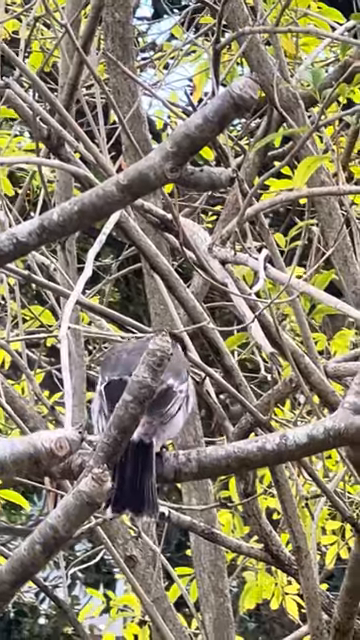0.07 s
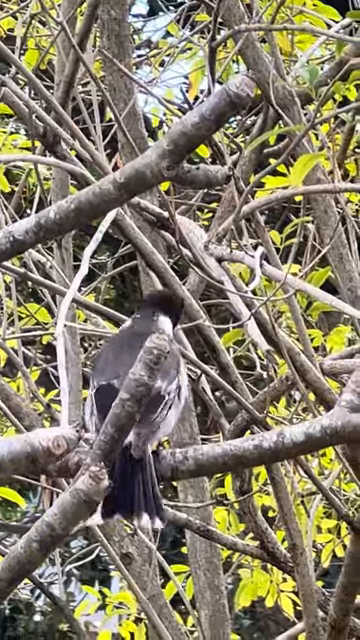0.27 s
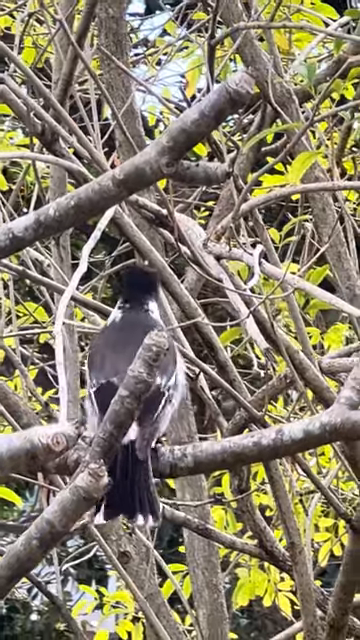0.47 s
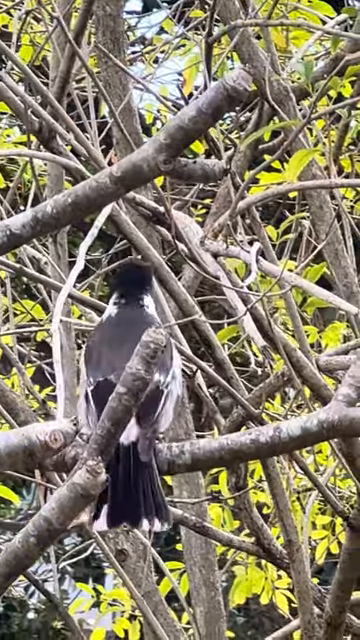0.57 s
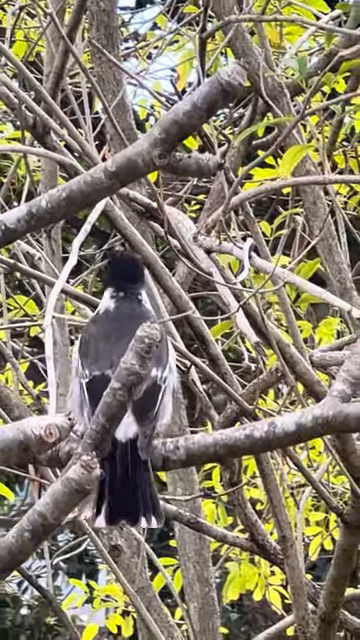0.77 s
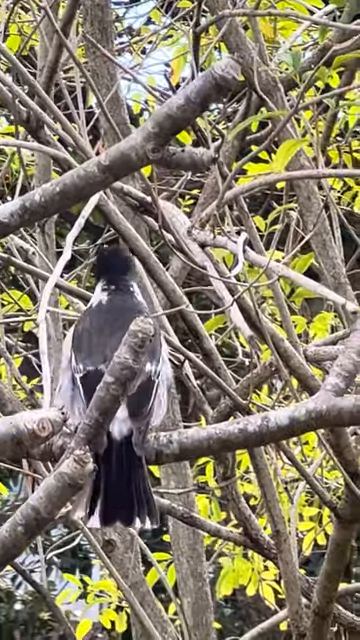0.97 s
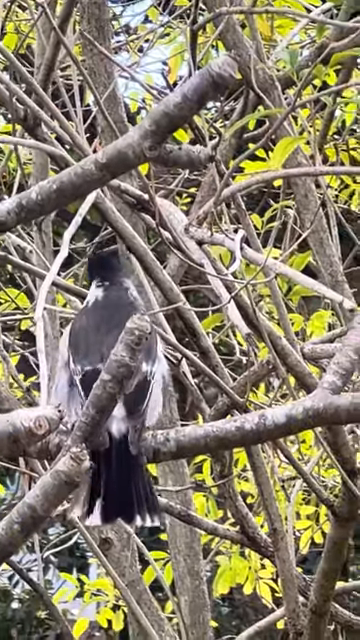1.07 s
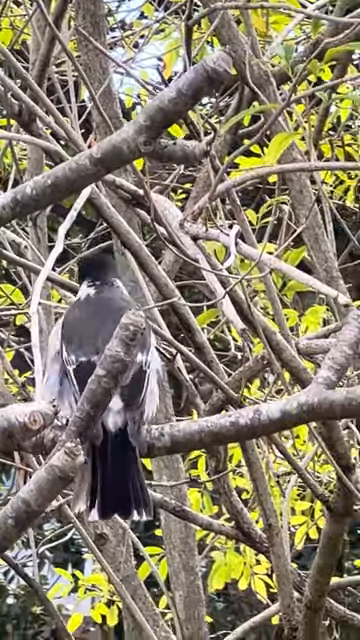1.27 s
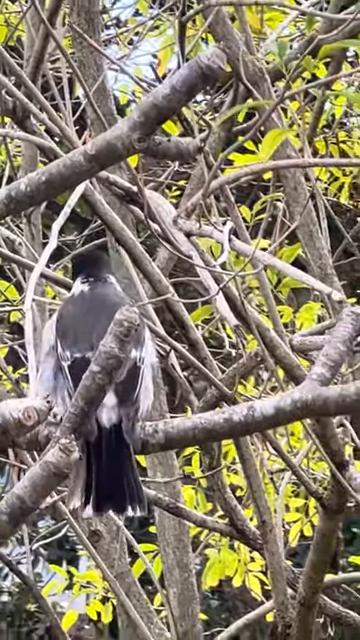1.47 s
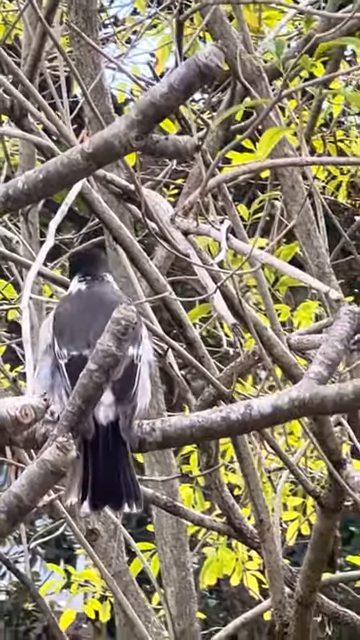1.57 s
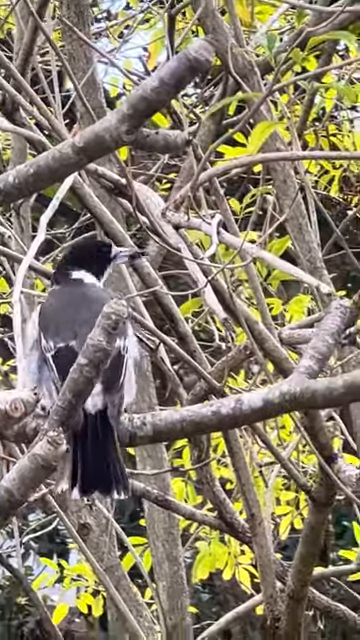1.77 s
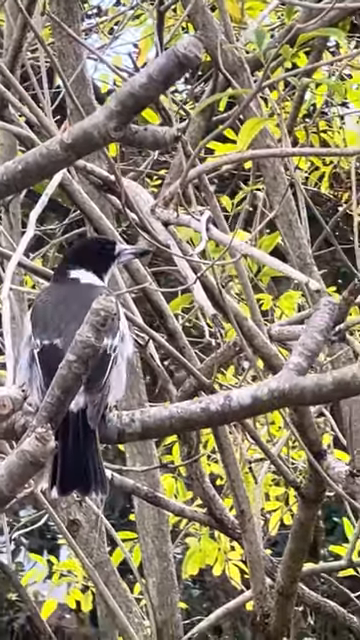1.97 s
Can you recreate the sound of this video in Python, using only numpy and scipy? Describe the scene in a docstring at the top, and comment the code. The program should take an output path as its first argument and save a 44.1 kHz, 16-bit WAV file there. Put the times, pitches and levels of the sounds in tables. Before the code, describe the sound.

A butcherbird sings close by: a rasp, clear slurred whistles, another rasp, then soft falling warbles

```python
"""Butcherbird close by among trees

A butcherbird sings from a near branch: a rasp, five down-slurred whistles, a lower rasp that snaps
into a last whistle, then soft, mostly falling warbles, a thin high tone and small clicks.
Whistles are gliding sines with flickering overtones; rasps are tones chopped by a flutter, plus hiss.
The trees answer with delayed copies and a tail of dying noise; a faint call wavers far off,
and light air, made of shaped noise and low bumps, rumbles on the microphone."""
import sys
import numpy as np
from scipy import signal
from scipy.fft import rfft, irfft
from scipy.io import wavfile

SR = 44100
rng = np.random.default_rng(int(sys.argv[2]) if len(sys.argv) > 2 else 0)


def put_to_file(sound):
    """Save the sound as 16-bit audio at rate SR, in the file named by the first command-line argument."""
    columns = np.atleast_2d(sound).T  # one column per channel
    safe = np.clip(columns, -1, 1)
    whole_steps = np.round(safe * 32767)
    wavfile.write(sys.argv[1], SR, whole_steps.astype(np.int16))


N = 88200
T = np.arange(N) / SR

# Whistled notes: start_s, length_s, held_pitch_hz, start_above_hz, slur_time_s, sag_hz_per_s, level_db,
# overtones_db, left_lean_db, final_drop_hz, bill_resonance_hz
WHISTLE_NOTES = [(0.262, 0.076, 1431, 299, 0.0076, 0, -23.5, -3, 19, 1.5, 7330),
                 (0.426, .037, 1476, 331, 0.0065, 49, -22, -6, 20, -22.5, 6700),
                 (0.532, .058, 2017, 301, .022, -2.5, -34.5, 10.5, 25, 217.5, 4300),
                 (0.633, 0.097, 1518, 747.5, 0.0055, -21, -21.5, -2, 9.5, -24, 5080),
                 (0.801, 0.046, 1493, 148.5, 0.0078, 652.5, -24.5, -1, 22, 2.5, 5460),
                 (1.071, 0.029, 1494, -400, 0.00502, 1495, -24, -1.5, 32, 114, 4450)]
# Overtone colour of whistles and chirps: frequency_hz, level_db
WHISTLE_OVERTONES = [(2900, -33), (4400, -26.5), (7400, -27.5), (8600, -41), (12200, -40.5), (13500, -47.5),
                     (15200, -39.5)]
ATTACK_S, RELEASE_S, DROP_S = 0.011, 0.0061, 0.0034
OVERTONE_LEAD_S = .005  # overtones let go this much before the whistle
JITTER_SHARE, JITTER_HZ, WAVER_SHARE = 0.0024, 483, 0.00262  # shares of the pitch
BILL_DB, BILL_WIDTH_HZ, FLICKER_DB = 6.5, 510, 3.5

# Quick falling chirps that lead into a whistle: start_s, length_s, pitch_hz, level_db, overtones_db
CHIRPS = [(0.408, 0.013, 1900, -44.5, 8.5), (0.623, 0.011, 2380, -37.5, 20.5),
          (.798, 0.0069, 1650, -30, 2.5)]
# Colour of the air after each chirp: frequency_hz, density_db_per_hz
PUFF_COLOUR = [(1500, -22.5), (6500, 2), (15500, -19.5)]
CHIRP_FALL_HZ_PER_S = 28000
PUFF_DB, PUFF_DECAY_S = -20, 0.019

# Rasped notes: start_s, length_s, pitch_hz, rise_hz_per_s, pulses_per_s, attack_s, level_db,
# swell_db_per_s, low_tone_hz, low_tone_db, hiss_db, hiss_swell_db_per_s
RASP_NOTES = [(0.143, .106, 1659, 1895, 160, 0.043, -35, 86.5, 834, -20, -15, 117.5),
              (0.935, 0.133, 1277, 1200, 140, 0.016, -33.5, 19, 712, -17.5, -16.5, 12)]
# Hiss colour, one curve per rasp: frequency_hz, density_db_per_hz
RASP_HISS_COLOURS = [
    [(750, -7.5), (2200, 12.5), (3900, -13), (5750, 6), (7000, -9), (15200, -36)],
    [(600, -13), (2000, 10), (3300, -22.5), (4700, 10), (5700, -8), (7100, -1.5), (8100, -59), (9300, -7),
     (10900, -33), (15200, -19)],
]
# Lower tones inside a rasp: pitch_ratio, level_db
RASP_LOW_TONES = [(1, -0.5), (1.27, -5)]
RASP_DEPTH = .65
RASP_PULSE_JITTER, RASP_PITCH_JITTER, RASP_BEND, LOW_JITTER = .16, .032, .045, .035  # shares

# Soft warbles, one curve per note: time_s, pitch_hz, level_db
WARBLE_CURVES = [
    [(1.61, 2178, -62), (1.623, 1398, -50), (1.642, 1188, -44), (1.668, 1006, -59.5)],
    [(1.664, 780, -47.5), (1.677, 795, -42), (1.700, 870, -55.5), (1.716, 747, -43), (1.728, 626, -54.5)],
    [(1.750, 692.5, -56.5), (1.772, 713, -44.5), (1.786, 782, -56)],
    [(1.785, 5520, -78.5), (1.83, 6900, -80)],
    [(1.954, 2234, -60), (1.966, 2280, -53.5), (1.975, 1562, -48.5), (1.992, 1227, -41.5), (2.0, 1264, -38)],
]
# Overtone colour of the warbles: frequency_hz, level_db
WARBLE_COLOUR = [(3500, -40.5), (4500, -9.5), (4900, -20.5)]
# Thin high tone above the warbles: time_s, pitch_hz, level_db
THIN_TONE_CURVE = [(1.615, 2430, -73), (1.72, 2723, -72), (1.885, 2754, -68)]
# Small clicks of bill and perch: start_s, ring_hz, decay_s, ring_db, broad_tick_db
BILL_CLICKS = [(1.278, 540, 0.0024, -39, -84), (1.348, 3220, 0.0051, -56, -47),
               (1.92, 1590, 0.003, -35.5, -46.5), (1.922, 521, 0.0028, -42, -71)]

# Echoes off trunks and ground: delay_s, left_db, right_db
TREE_ECHOES = [(0.0125, -38, -6.5), (0.0241, -10.5, -26.5), (0.0311, -23.5, -8), (.072, -28.5, -12.5)]
# Colour of the near foliage: frequency_hz, level_db
NEAR_COLOUR = [(1500, -7), (4500, 2.5), (9000, 12)]
# Colour of the far trees: frequency_hz, level_db
FAR_TREE_COLOUR = [(700, 4), (7000, 7), (10000, -29)]
ECHO_DULL_HZ = 3490
NEAR_DB, NEAR_T60_S, FAR_DB, FAR_T60_S = -2, 0.16, -16.5, 0.65  # T60: time to die by 60 dB

# Distant wavering call: time_s, pitch_hz, level_db
FAR_CALL_CURVE = [(1.29, 669, -68), (1.4, 758.6, -62), (1.67, 728, -71)]
FAR_WAVER = 0.049  # share of the pitch

# Rumble on the microphone: frequency_hz, density_db_per_hz
RUMBLE_COLOUR = [(25, -22), (65, 0.5), (170, -10), (260, -24.5), (1500, -65)]
# Soft bumps on the microphone: start_s, pitch_hz, decay_s, level_db
MIC_BUMPS = [(0.354, 226, 0.012, -43), (0.393, 107.6, 0.011, -32.5), (1.332, 77, 0.017, -31.5),
             (1.476, 127.6, 0.0085, -33)]
# Hush shared by both channels: frequency_hz, density_db_per_hz
AIR_COLOUR = [(1450, -8), (2400, -15.5), (13000, -49.5)]
# Faint wide murmur around 700 to 1200 Hz, separate in each channel: frequency_hz, density_db_per_hz
DISTANT_COLOUR = [(700, -5), (1200, -7), (8000, -42.5)]
RUMBLE_DB, GUST_DB, AIR_DB, DISTANT_DB = -54.5, 4, -65.5, -64

MONO_ABOVE_HZ, CUTOFF_HZ = 1690, 15750
TREBLE_FROM_HZ, TREBLE_TURN_RAD = 5070, 1.32  # above this the right channel leads in phase


def from_db(db):
    """Decibels to gain."""
    return 10 ** (np.asarray(db) / 20)


def rms_one(x):
    """Scale to unit power."""
    return x / np.sqrt(np.mean(x ** 2) + 1e-20)


def gain_at(points, hz):
    """Read a spectrum's gain at given frequencies, straight in dB over log frequency."""
    f, db = np.transpose(points)
    return from_db(np.interp(np.log(np.maximum(hz, 1)), np.log(f), db))


def coloured(x, points):
    """Give a noise a spectrum."""
    return irfft(rfft(x) * gain_at(points, np.fft.rfftfreq(N, 1 / SR)), N)


def noise(points):
    """Coloured noise of unit power."""
    return rms_one(coloured(rng.standard_normal(N), points))


def drift(rate):
    """Random wander of unit power: noise smoothed twice above the rate in Hz."""
    r = np.exp(-2 * np.pi * rate / SR)
    wander = signal.lfilter([1], [1, -2 * r, r * r], rng.standard_normal(2 * N))
    return rms_one(wander[N:])  # skip the filter's settling


def gate(age, length, attack, release):
    """Smooth attack, hold and release; the release is halfway down at the length."""
    opening = np.sin(np.pi / 2 * np.clip(age / attack, 0, 1)) ** 2
    closing = np.sin(np.pi / 2 * np.clip((length - age) / release + .5, 0, 1)) ** 2
    return opening * closing


def burst(start, decay, rise):
    """A quick rise that dies away exponentially."""
    age = np.maximum(T - start, 0)
    return (1 - np.exp(-age / rise)) * np.exp(-age / decay)


def phase_of(hz):
    """Running phase of a pitch."""
    return 2 * np.pi * np.cumsum(hz) / SR


def overtones(hz, colour, bill_hz=0, count=11):
    """Flickering multiples of a pitch; the open bill lifts those near its resonance."""
    phase = phase_of(hz)
    out = np.zeros(N)
    for k in range(2, count + 1):
        bill_lift_db = BILL_DB / (1 + ((k * hz - bill_hz) / BILL_WIDTH_HZ) ** 2)
        level = gain_at(colour, k * hz) * from_db(bill_lift_db + FLICKER_DB * drift(45))
        out += level * (k * hz < SR / 2) * np.sin(k * phase)
    return out


def glide(curve):
    """Jittered pitch and gated strength of one soft note drawn as a curve."""
    s, hz, db = np.transpose(curve)
    pitch = np.interp(T, s, hz) * (1 + 0.00723 * drift(490))
    shape = gate(T - s[0], s[-1] - s[0] + 0.00092, 0.0033, 0.0041)
    return pitch, np.sqrt(2) * from_db(np.interp(T, s, db)) * shape


def whistles():
    """Each note slurs onto its held pitch and may bend as it ends; gives the voice and its lean to the left."""
    voice, side = np.zeros(N), np.zeros(N)
    for (start, length, held, above, slur, sag, db, bright_db,
         pan_db, drop, bill_hz) in WHISTLE_NOTES:
        age = np.clip(T - start, 0, length + RELEASE_S)
        hz = held + above * np.exp(-age / slur) - sag * age - drop * np.exp((age - length) / DROP_S)
        hz = hz * (1 + JITTER_SHARE * drift(JITTER_HZ) + WAVER_SHARE * drift(63.3))
        level = np.sqrt(2) * from_db(db) * gate(age, length, ATTACK_S, RELEASE_S)
        tone = level * np.sin(phase_of(hz))
        bright_gate = gate(age, length - OVERTONE_LEAD_S, ATTACK_S, ATTACK_S)
        bright_level = np.sqrt(2) * from_db(db + bright_db) * bright_gate
        voice += tone + bright_level * overtones(hz, WHISTLE_OVERTONES, bill_hz)
        lean = from_db(pan_db)  # left over right
        side += tone * (lean - 1) / (lean + 1)
    return voice, side


def flicks():
    """A bright chirp dives into the coming whistle and leaves a puff of hiss."""
    out = np.zeros(N)
    for start, length, pitch, db, bright_db in CHIRPS:
        age = np.clip(T - start, 0, 2 * length)
        hz = pitch - CHIRP_FALL_HZ_PER_S * age
        level = np.sqrt(2) * from_db(db) * gate(age, length, length / 2, length / 2)
        bright = from_db(bright_db) * overtones(hz, WHISTLE_OVERTONES)
        out += level * (np.sin(phase_of(hz)) + bright)
        puff = burst(start, PUFF_DECAY_S, rise=PUFF_DECAY_S) * noise(PUFF_COLOUR)
        out += from_db(db + bright_db + PUFF_DB) * puff
    return out


def rasp_low_tones(low_hz):
    """Sum of the lower tones, each wavering on its own."""
    out = np.zeros(N)
    for ratio, tone_db in RASP_LOW_TONES:
        hz = ratio * low_hz * (1 + LOW_JITTER * drift(171))
        out += from_db(tone_db) * np.sin(phase_of(hz))
    return out


def rasps():
    """An uneven flutter chops and bends a main tone over a hiss and two wavering lower tones."""
    out = np.zeros(N)
    for note, colour in zip(RASP_NOTES, RASP_HISS_COLOURS):
        (start, length, pitch, rise, rate, attack, db, swell_db,
         low_hz, low_db, hiss_db, hiss_swell_db) = note
        age = np.clip(T - start, 0, 2 * length)
        from_middle = age - length / 2  # swells pivot on the middle of the note
        flutter = phase_of(rate * (1 + RASP_PULSE_JITTER * drift(103)))
        pulses = (1 + RASP_DEPTH * np.cos(flutter)) * from_db(drift(78))
        bend = 1 + RASP_PITCH_JITTER * drift(210) + RASP_BEND * np.sin(flutter)
        main = np.sqrt(2) * np.sin(phase_of((pitch + rise * age) * bend))
        low = np.sqrt(2) * from_db(low_db + drift(100)) * rasp_low_tones(low_hz)
        hiss = from_db(hiss_db + hiss_swell_db * from_middle) * noise(colour)
        level = from_db(db + swell_db * from_middle) * gate(age, length, attack, RELEASE_S)
        out += level * (rms_one(pulses) * main + hiss + low)
    return out


def soft_song():
    """Quiet gliding warbles, mostly falling, with one thin, high tone."""
    hz, level = glide(THIN_TONE_CURVE)
    out = level * np.sin(phase_of(hz))
    for curve in WARBLE_CURVES:
        hz, level = glide(curve)
        out += level * (np.sin(phase_of(hz)) + overtones(hz, WARBLE_COLOUR, count=3))
    return out


def clicks():
    """Short broad ticks, each with a brief ring."""
    tick = noise([(1400, -1), (10000, -40)])  # (Hz, dB per Hz)
    out = np.zeros(N)
    for s, hz, decay, db, tick_db in BILL_CLICKS:
        ring = from_db(db) * np.sin(2 * np.pi * hz * (T - s))
        out += burst(s, decay, rise=0.00079) * (ring + from_db(tick_db) * tick)
    return out


def scatter(colour, t60):
    """Dying cloud of reflections from leaves and twigs."""
    cloud = coloured(rng.standard_normal(N), colour)
    fade = from_db(-60 * T / t60) * (1 - np.exp(-T / 0.0017))
    return cloud * fade / np.sqrt(np.sum(fade ** 2))


def trees(x):
    """A few dull echoes, near foliage and a longer far tail, the tails separate in each channel."""
    tails = []
    for _ in range(2):
        near = from_db(NEAR_DB) * scatter(NEAR_COLOUR, NEAR_T60_S)
        far = from_db(FAR_DB) * scatter(FAR_TREE_COLOUR, FAR_T60_S)
        tails.append(signal.fftconvolve(x, near + far)[:N])
    out = np.array(tails)
    dull = signal.sosfiltfilt(signal.butter(2, ECHO_DULL_HZ, fs=SR, output="sos"), x)
    for delay, left_db, right_db in TREE_ECHOES:
        late = np.pad(dull, (round(delay * SR), 0))[:N]
        out += from_db([[left_db], [right_db]]) * late
    return out


def far_call():
    """A faint low tone that wavers and fades in and out."""
    hz, level = glide(FAR_CALL_CURVE)
    wavering = hz * (1 + FAR_WAVER * drift(74))
    return level * from_db(FLICKER_DB * drift(30)) * np.sin(phase_of(wavering))


def air():
    """Gusty rumble and ringing low bumps on the microphone over a faint outdoor hush and a soft, wide murmur
    near 1 kHz."""
    bumps = np.zeros(N)
    for s, hz, decay, db in MIC_BUMPS:
        bumps += from_db(db) * burst(s, decay, rise=0.00062) * np.sin(2 * np.pi * hz * (T - s))
    rumble = from_db(RUMBLE_DB + GUST_DB * drift(17)) * noise(RUMBLE_COLOUR)
    hush = from_db(AIR_DB) * noise(AIR_COLOUR)
    wide_murmur = from_db(DISTANT_DB) * np.array([noise(DISTANT_COLOUR), noise(DISTANT_COLOUR)])
    return bumps + rumble + hush + wide_murmur


def scene():
    """The bird among the trees, its whistles leaning left; a far call and the air."""
    voice, side = whistles()
    bird = voice + flicks() + rasps() + soft_song() + clicks()
    return bird + side * np.array([[1], [-1]]) + trees(bird) + far_call() + air()


def record(dry):
    """The treble is alike in both channels, its upper part turned in phase; the top is cut."""
    mid, side = (dry[0] + dry[1]) / 2, (dry[0] - dry[1]) / 2
    side = signal.sosfiltfilt(signal.butter(8, MONO_ABOVE_HZ, fs=SR, output="sos"), side)
    hz = np.fft.rfftfreq(N, 1 / SR)
    turn = TREBLE_TURN_RAD / 2 * (1 - 1 / (1 + (hz / TREBLE_FROM_HZ) ** 20))  # half for each channel
    spectra = rfft(np.array([mid + side, mid - side]))
    both = irfft(spectra * np.exp(1j * turn * np.array([[-1], [1]])), N)
    top = signal.ellip(10, .1, 80, CUTOFF_HZ, fs=SR, output="sos")
    return signal.sosfilt(top, both)


dry = scene()
out = record(dry)
put_to_file(out)
```